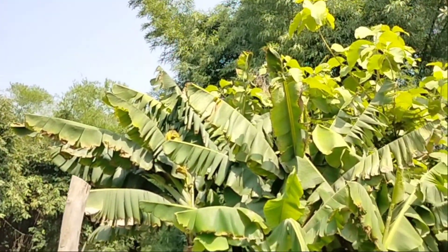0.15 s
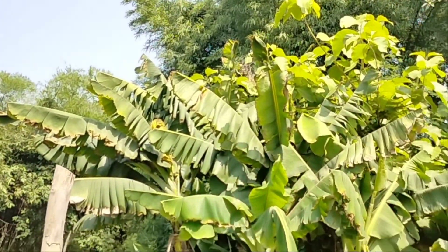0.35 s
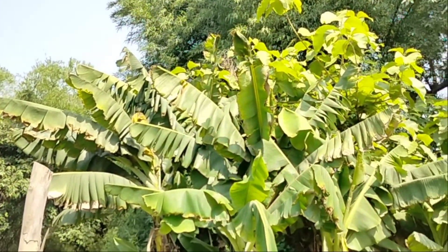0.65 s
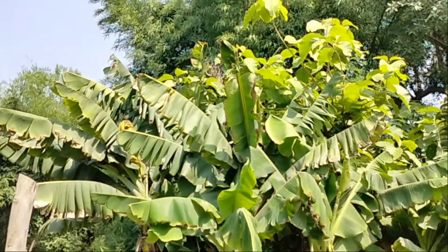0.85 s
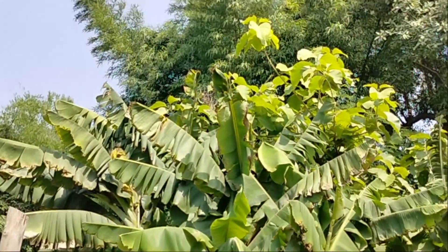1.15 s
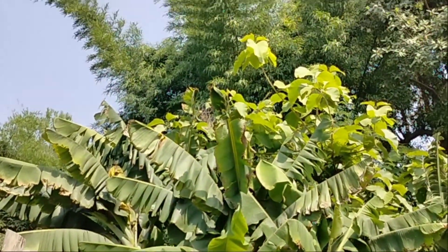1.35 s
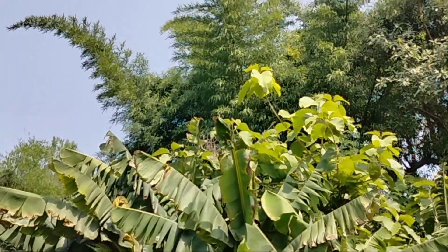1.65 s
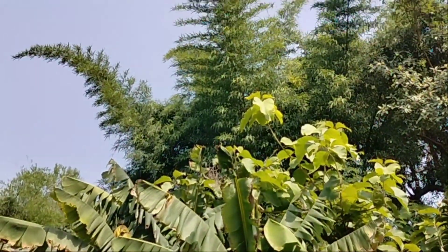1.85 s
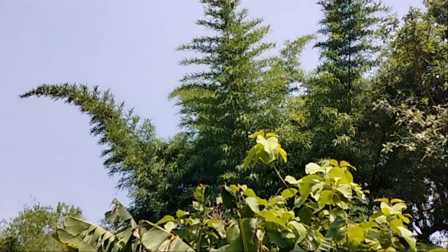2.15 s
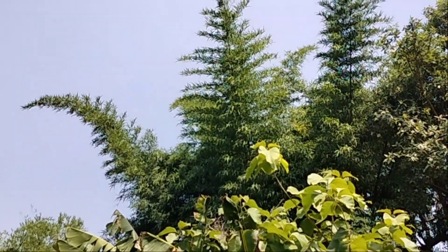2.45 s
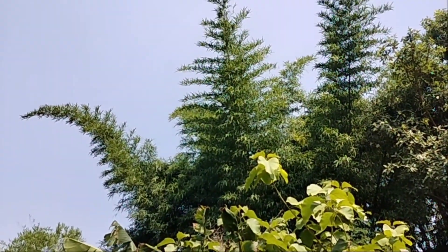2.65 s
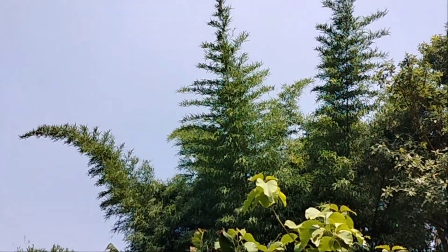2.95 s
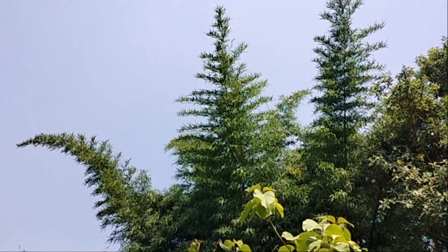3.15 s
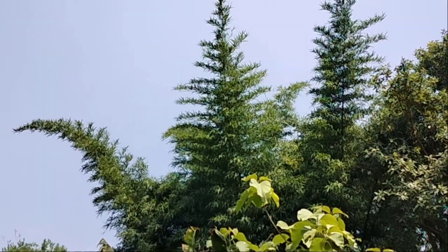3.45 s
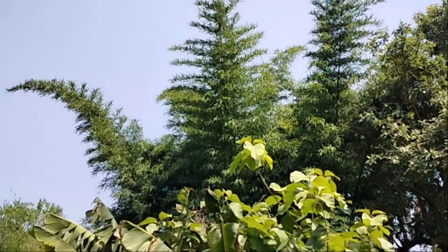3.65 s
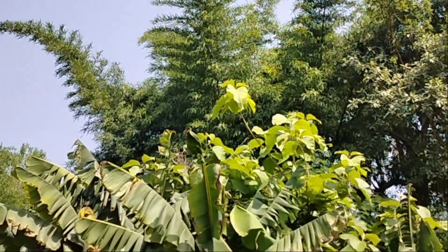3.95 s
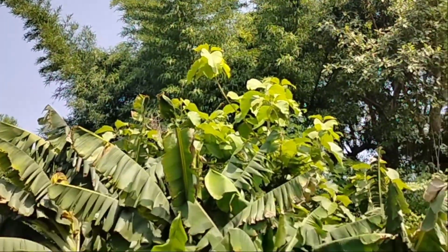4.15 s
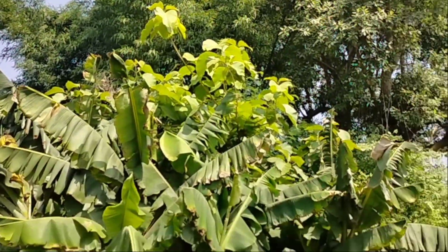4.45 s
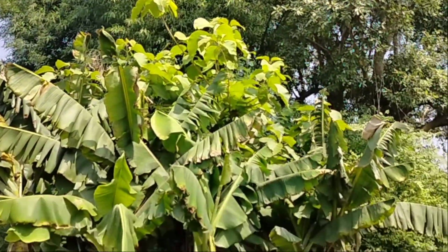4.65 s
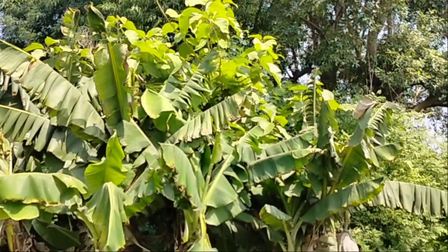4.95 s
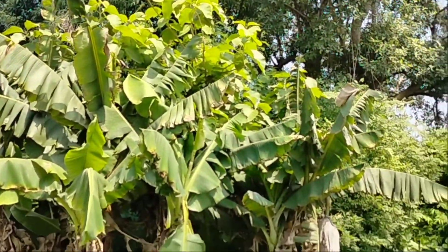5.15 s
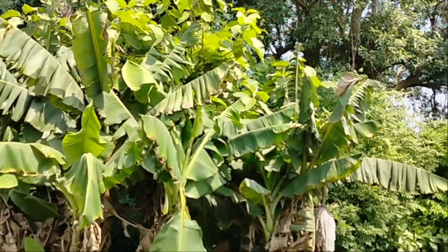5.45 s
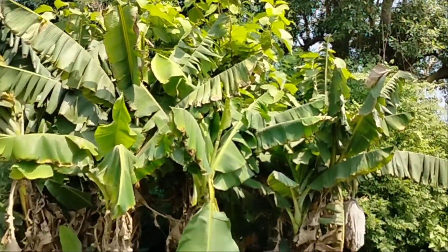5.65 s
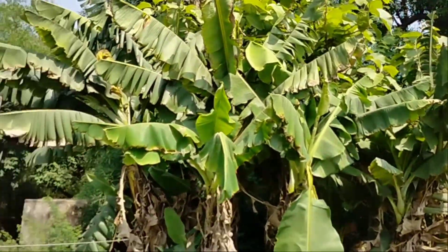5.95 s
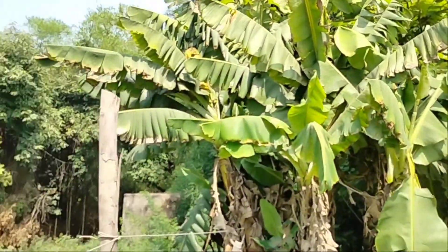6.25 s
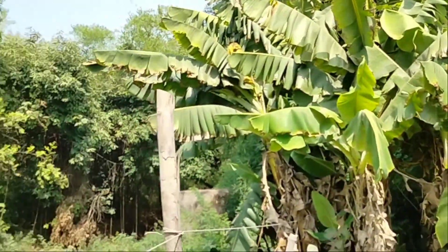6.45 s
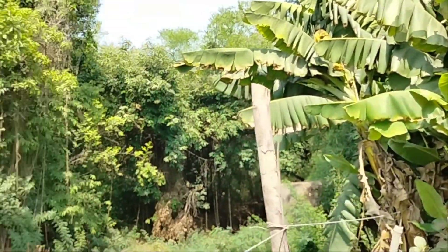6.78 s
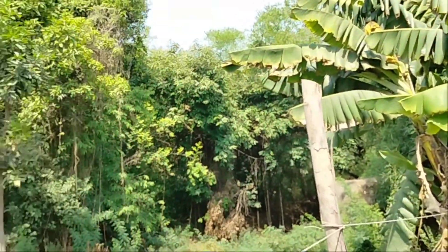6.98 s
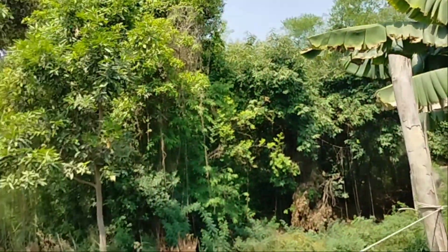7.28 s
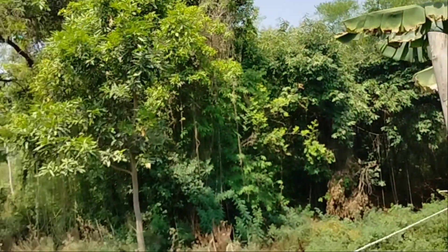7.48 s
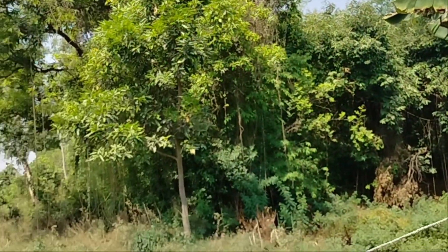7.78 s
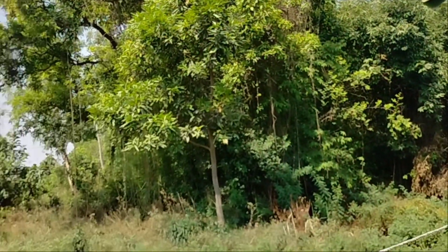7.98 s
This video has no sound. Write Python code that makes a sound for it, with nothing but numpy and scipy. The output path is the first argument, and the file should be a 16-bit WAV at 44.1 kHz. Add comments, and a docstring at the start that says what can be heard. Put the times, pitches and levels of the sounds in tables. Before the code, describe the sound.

Cicadas drone steadily at a high pitch in a rural field, over a light breeze, far traffic and faint bird whistles.

```python
"""A hot field edged with bamboo and banana plants. From the start cicadas drone, their clicking ribs
ringing hollow bodies: a few near ones over a far chorus, with a fine hiss of grass insects on top.
Far traffic murmurs and hums beneath, a breeze stirs the leaves, and faint birds whistle now and then.
Around 2 s the higher cicadas come forward, while the traffic rumble settles. From 5.6 s dry stems
and leaves knock and tick four times, and at 6.2 s the insects' thin top sizzle steps up."""
import sys
import numpy as np
from scipy import signal
from scipy.fft import rfft, irfft, next_fast_len
from scipy.io import wavfile
from scipy.ndimage import uniform_filter1d, map_coordinates

SR = 44100
rng = np.random.default_rng(int(sys.argv[2]) if len(sys.argv) > 2 else 0)


def persist_wave(psi):
    """Save psi, clipped to +-1, as 16-bit WAV."""
    counts = np.round(np.clip(psi, -1, 1) * 32767).astype(np.int16)
    wavfile.write(sys.argv[1], SR, np.atleast_2d(counts).T)


N = 358091
TIME = np.arange(N) / SR


def from_db(db):
    """Decibels to gain."""
    return 10 ** (np.asarray(db) / 20)


def rms_one(x):
    """Scale to rms 1."""
    return x / np.sqrt(np.mean(x ** 2) + 1e-20)


def automation(points):
    """Draw straight lines through (time, value) points, at every sample."""
    return np.interp(TIME, *np.transpose(points))


def presence(start, end, fade_s):
    """1 while a source sounds, with a fade at each end."""
    return np.clip(np.minimum(TIME - start, end - TIME) / fade_s, 0, 1)


def swells(rest_db, rows):
    """Gain of a bed with bell-shaped swells on top, added in power."""
    bells = sum(from_db(db) ** 2 * np.exp(-((TIME - s) / half) ** 2) for s, half, db in rows)
    return np.sqrt(from_db(rest_db) ** 2 + bells)


def drift(rate, count=N):
    """Smooth random modulation through `rate` points a second; spread near 1."""
    coarse = np.arange(0, count + 64, 64)
    knots = rng.standard_normal(int(count / SR * rate) + 4)
    curve = map_coordinates(knots, [coarse / SR * rate + 1], order=3, mode="nearest")
    return np.interp(np.arange(count), coarse, curve)


def coloured(x, spectrum):
    """Shape a steady sound with an EQ curve; rms 1."""
    size = next_fast_len(N)
    hz, db = np.transpose(spectrum)
    bins = np.maximum(np.fft.rfftfreq(size, 1 / SR), 1)
    gain = from_db(np.interp(np.log(bins), np.log(hz), db, left=-80, right=-80))
    return rms_one(irfft(rfft(x, size) * gain, size)[:N])


def patchy_hiss(spectrum, patchy_db, size=2048):
    """Distant noise swells and sinks in narrow patches of pitch as the air moves; rms 1."""
    cells = signal.stft(rng.standard_normal(N), nperseg=size)[2]
    patches = uniform_filter1d(rng.standard_normal(cells.shape), size=4, axis=0)   # smooth in pitch
    patches = rms_one(uniform_filter1d(patches, size=9, axis=1))   # and in time
    noise = signal.istft(cells * from_db(patchy_db * patches), nperseg=size)[1][:N]
    return coloured(noise, spectrum)


def evened(x, span_s=0.19):
    """Hold the slow level of a sound at 1."""
    power = np.abs(uniform_filter1d(x ** 2, int(span_s * SR)))
    return x / np.sqrt(power + 1e-12)


def foliage(x, t60, direct):
    """Leaves and trunks scatter a sound into a short, dense tail beside the direct path."""
    t = np.arange(SR // 2) / SR
    tail = rng.standard_normal(len(t)) * from_db(-60 * t / t60)
    return direct * x + signal.oaconvolve(x, tail / np.sqrt(np.sum(tail ** 2)))[:N]


def tymbal(strokes_per_s, ribs_per_s, wander=0.005, ribs=4):
    """Click times of one cicada: each muscle stroke buckles a row of ribs, at a slightly loose pace."""
    strokes = int(strokes_per_s * (N / SR + 1))
    sway = rms_one(uniform_filter1d(rng.standard_normal(strokes), size=60, mode="wrap"))
    pace = strokes_per_s * (1 + wander * sway)
    starts = np.cumsum(1 / pace) - 0.5 * rng.random()
    return (starts[:, None] + np.arange(ribs) / ribs_per_s).ravel()


def crowd_clicks(insects=32):
    """Many tymbals, each at its own pace, blurred by the trees."""
    times = [tymbal(rng.uniform(66, 94), rng.uniform(319.76, 537.7)) for _ in range(insects)]
    at = SR * np.concatenate(times)
    at = at[(at > 0) & (at < N - 1)]
    whole, part = at.astype(int), at % 1   # each click is shared between two samples
    clicks = np.bincount(whole, 1 - part, N) + np.bincount(whole + 1, part, N)
    return rms_one(foliage(clicks - clicks.mean(), t60=0.28, direct=0.58))


def cicada_chorus(blur_db=-5.5, swell_db=0.35, trim_db=-1.64):
    """Click trains ring the insects' hollow bodies in three registers; the farthest merge into a hiss."""
    # how hard the cicadas sing together: t/s, level/dB
    effort = [(0, -32.5), (0.6, -32.5), (0.9, -31), (1.3, -34), (1.7, -31.5), (2.3, -35), (3.5, -35),
              (4.1, -35), (4.7, -34), (5.35, -37.5), (5.95, -33.5), (6.4, -34), (6.85, -33.5), (8.12, -35)]
    # body resonance of each register: f/Hz, level/dB
    low_body = [(3050, -54), (3400, -43.5), (3580, -32.5), (3900, -28.5), (4080, -20), (4260, -13),
                (4400, -5), (4600, -1), (4720, -3), (5000, -41), (5600, -44)]
    middle_body = [(4200, -32), (4550, -11.5), (4720, -7), (4880, 2.5), (5020, 2), (5200, -11), (5700, -38),
                   (6500, -54)]
    high_body = [(4700, -15), (5100, -5.5), (5300, 3), (5500, 0.5), (5750, -5), (6000, -9), (6400, -31),
                 (7400, -42)]
    # balance tipping toward the higher singers: t/s, tilt/dB
    tilt = [(0, -3), (1.75, -3), (2.1, 1), (3.8, -.8), (6.9, -0.2), (7.8, 2.5)]
    # mix of the low, middle and high singers: offset/dB, share of the tilt
    registers = [(-2, -0.53), (-6, 0.67), (-13, 0.78)]
    effort_db, tilt_db = automation(effort), automation(tilt)
    out = 0
    for body, (offset_db, share) in zip((low_body, middle_body, high_body), registers):
        crowd = crowd_clicks() + from_db(blur_db) * rng.standard_normal(N)
        song_db = effort_db + offset_db + share * tilt_db + swell_db * drift(5)
        out = out + from_db(song_db + trim_db) * evened(coloured(crowd, body))
    return out


def near_cicadas(wander=0.000914, fading_db=3.0, trim_db=0.55):
    """Steady tymbals sing overtones on the body resonance; each fades as paths through leaves shift."""
    # soloists: start/s, end/s, first stroke rate/Hz, last stroke rate/Hz, [(overtone, level/dB), ..]
    soloists = [(-1, 2.2, 75.09, 75.04, [(47, -75), (48, -73), (55, -62), (59, -44), (60, -48), (61, -46),
                (64, -51), (65, -46), (68, -59), (70, -64), (71, -62)]), (-1, 2.1, 77.95, 78.25, [(55, -60),
                (56, -52)]), (.3, 2.1, 78.5, 78.6, [(58, -52), (59, -45)]),
                (1.8, 6.2, 74.87, 74.78, [(47, -77), (48, -75), (55, -64), (59, -51), (60, -49), (64, -53),
                (65, -51), (66, -54), (71, -61), (72, -67)]), (1.4, 4.5, 76.3, 76.24, [(54, -64), (60, -49),
                (61, -53), (66, -52)]), (4.2, 6.6, 76.3, 76.55, [(60, -46), (61, -53)]),
                (6.3, 9, 74.6, 74.5, [(48, -75), (59, -47), (60, -44), (64, -52), (66, -52), (70, -62),
                (71, -51)]), (7.1, 9, 80.6, 80.7, [(58, -48), (60, -46), (61, -46), (62, -49), (71, -60)])]
    out = np.zeros(N)
    for start, end, first_hz, last_hz, overtones in soloists:
        fade = presence(start, end, fade_s=0.38)
        on = np.flatnonzero(fade)
        pace = np.interp(TIME[on], [start, end], [first_hz, last_hz]) * (1 + wander * drift(5, len(on)))
        phase = 2 * np.pi * np.cumsum(pace) / SR
        song = 0
        for overtone, db in overtones:
            gain = from_db(db + fading_db * drift(6.04, len(on)))
            song = song + gain * np.sin(overtone * phase + 2 * np.pi * rng.random())
        out[on] += from_db(trim_db) * np.sqrt(2) * fade[on] * song
    return out


def grass_insects(rasp_db=-49, sizzle_db=-69.5, step_db=3, step_at_s=6.2, rise_s=0.25):
    """Countless small raspers merge into a smooth hiss, topped by a thin sizzle that steps up once."""
    # colours of the hiss and of the sizzle: f/Hz, level/dB
    rasp_colour = [(5500, -34), (6400, -12.5), (7000, -13), (7500, -4), (8000, 1.5), (8500, -1.5),
                   (9100, -8), (10000, -20.5), (11000, -36), (12500, -46.5)]
    sizzle_colour = [(6000, -23.5), (10000, -0.5), (12000, -14), (13200, -9), (14200, -4), (15100, 0.5),
                     (16000, -2)]
    flutter_db = 0.08 * drift(1.2) + 0.38 * drift(20)
    rasp = from_db(rasp_db + flutter_db) * patchy_hiss(rasp_colour, patchy_db=1.3)
    lift_db = step_db * np.clip((TIME - step_at_s) / rise_s, 0, 1)
    return rasp + from_db(sizzle_db + lift_db) * patchy_hiss(sizzle_colour, patchy_db=1.5)


def far_traffic(rumble_db=-75, opening_lift_db=5, settle_s=3, road_db=-68):
    """A low rumble settles to a steady bed, and the road's murmur swells as vehicles pass."""
    # colours of the rumble and of the road: f/Hz, level/dB
    rumble_colour = [(20, -20), (35, -19), (50, -21), (70, -5.5), (92, 1), (125, -6.5), (180, -5.5),
                     (260, -10.5), (400, -9), (800, -53)]
    road_colour = [(200, -32), (345, -25.5), (410, -2.5), (540, -2.5), (750, -2.5), (1000, -8), (2000, -35)]
    # pass-bys: t/s when nearest, half length/s, level/dB
    passes = [(.3, 0.46, -67.5), (3.7, 0.27, -69), (6.55, 0.18, -67.5), (8.05, 0.42, -64.5)]
    lift_db = opening_lift_db * np.exp(-TIME / settle_s)
    rumble = from_db(rumble_db + lift_db + drift(12)) * coloured(rng.standard_normal(N), rumble_colour)
    return rumble + swells(road_db, passes) * patchy_hiss(road_colour, patchy_db=1.1)


def breeze(leaves_db=-70, leaves_follow=0.32):
    """Moving air makes a soft wash; the leaves stir with it and rustle in short gusts."""
    # strength of the breeze: t/s, level/dB
    strength = [(0, -56.5), (.35, -58.8), (.85, -55), (1.25, -57), (2.2, -58.5), (3.45, -56.5),
                (4.2, -59.5), (6, -63), (7.05, -63), (7.75, -58.8), (8.12, -60)]
    # gusts in the leaves: t/s at the crest, half length/s, level/dB
    gusts = [(0, 0.14, -72), (.9, .15, -70), (2.05, 0.22, -66.5), (3.3, 0.65, -65), (6.73, 0.3, -64)]
    # colours of the air and of the leaves: f/Hz, level/dB
    air_colour = [(450, -45), (720, -8), (950, -0.5), (1280, -1), (1600, -3.5), (2000, -9.5), (2600, -20),
                  (4000, -33.5)]
    leaf_colour = [(1200, -25), (1900, -1.5), (2300, -0.5), (2900, -3.5), (3600, 1), (6000, -12),
                   (10000, -23.5)]
    air_db = automation(strength)
    wash = from_db(air_db) * patchy_hiss(air_colour, patchy_db=2.0)
    stir = swells(leaves_db + leaves_follow * (air_db - air_db.mean()), gusts)
    return wash + stir * patchy_hiss(leaf_colour, patchy_db=4.0)


def far_engines(wander=0.01147, waver_db=2.4):
    """Only a wavering hum of each far engine carries across the field."""
    # engine hums: start/s, end/s, f/Hz, level/dB
    hums = [(-.5, 1, 109, -74.5), (.8, 8.6, 108.2, -82), (.4, 2.76, 213.3, -80.5), (2.8, 6.1, 213.7, -86),
            (5.2, 6.6, 214.4, -81), (6.3, 9.1, 525, -76.5)]
    out = 0
    for start, end, hz, db in hums:
        phase = 2 * np.pi * np.cumsum(hz * (1 + wander * drift(9))) / SR
        gain = from_db(db + waver_db * drift(9)) * presence(start, end, fade_s=0.31)
        out = out + gain * np.sqrt(2) * np.sin(phase)
    return out


def birds(rasp_hz=170):
    """Short gliding whistles, hoarse when their pitch shakes, heard through the trees."""
    # calls: t/s at the middle, length/s, first f/Hz, last f/Hz, relative level/dB, roughness
    calls = [(.02, .11, 2880, 2790, -59, .7), (0.886, .3, 1377, 1287, -56, 0.73),
             (2.024, .18, 2900, 2640, -59, 1.04), (2.952, .18, 1250, 1243, -52.5, 0.44),
             (2.962, .19, 1804, 1770, -59, 0.54), (3.269, .16, 2550, 2570, -61.5, .9),
             (3.486, 0.096, 1300, 1239, -46, 0.17), (3.49, .085, 3050, 2900, -60, 0.54),
             (4.196, .1, 1287, 1238, -48.5, 0.31), (5.204, .21, 1372, 1368, -61, 0.24),
             (6.693, .12, 2920, 2880, -68, 0.27), (7.041, .04, 2400, 2800, -65, .15),
             (7.079, .07, 2750, 2730, -59, .3), (7.118, .04, 2800, 3150, -62, 0.3),
             (7.205, .05, 2740, 2760, -68, .2), (7.265, .06, 2850, 3140, -64, 0.6),
             (7.63, .26, 1153, 1275, -58.5, 0.34)]
    out, shake = np.zeros(N), drift(500)
    for middle, length, first_hz, last_hz, db, roughness in calls:
        along = (TIME - middle) / length + 0.5
        on = (along > 0) & (along < 1)
        hz = first_hz + (last_hz - first_hz) * along[on] + roughness * rasp_hz * shake[on]
        envelope = from_db(db) * np.sin(np.pi * along[on])
        out[on] += envelope * np.sin(2 * np.pi * np.cumsum(hz) / SR)
    return 0.68 * foliage(out, t60=0.5, direct=1.64)


def leaf_ticks():
    """Dry leaves and stems snap or brush: a noise burst in one resonance that soon dies."""
    # knocks and ticks: t/s, peak level/dB, centre f/Hz, relative bandwidth, t60/s
    ticks = [(5.57, -57, 401, .4, 0.82), (6.317, -45.5, 1590, 0.22, 0.1), (6.7526, -47, 2900, .6, .04),
             (6.8179, -48, 2000, 1.0, 0.061)]
    out, t = np.zeros(N), np.arange(SR // 2) / SR
    for start, db, hz, width, t60 in ticks:
        edges_hz = [hz / (1 + width / 2), hz * (1 + width / 2)]
        resonance = signal.butter(1, edges_hz, "band", fs=SR, output="sos")
        burst = signal.sosfilt(resonance, rng.standard_normal(len(t)) * from_db(-60 * t / t60))
        at = round(start * SR)
        out[at:at + len(t)] += from_db(db) * burst / np.abs(burst).max()
    return out


def scene():
    """The whole field in mono: insects up front, everything else faint behind them."""
    insects = cicada_chorus() + near_cicadas() + grass_insects()
    return (insects + far_traffic() + breeze() + far_engines() + birds() + leaf_ticks())[None]


def record(dry, cutoff_hz=15450):
    """A steep low-pass takes off the very top."""
    return signal.sosfilt(signal.ellip(12, 0.1, 80, cutoff_hz, fs=SR, output="sos"), dry)


dry = scene()
out = record(dry)
persist_wave(out)
```